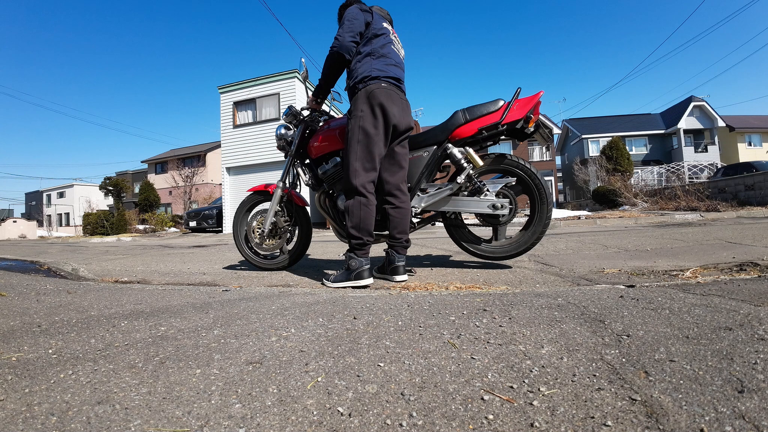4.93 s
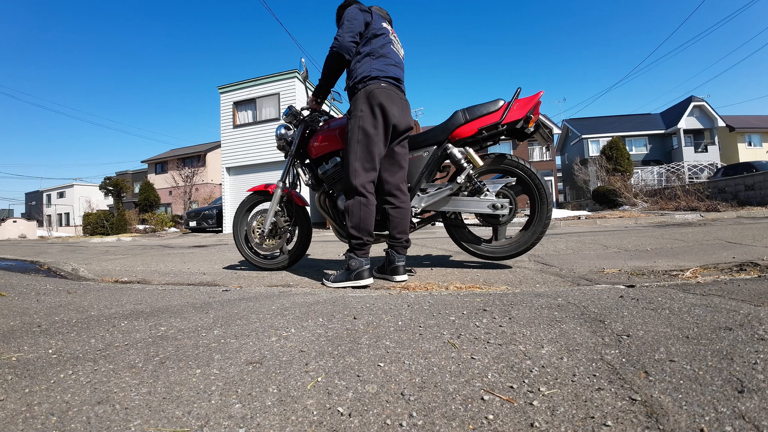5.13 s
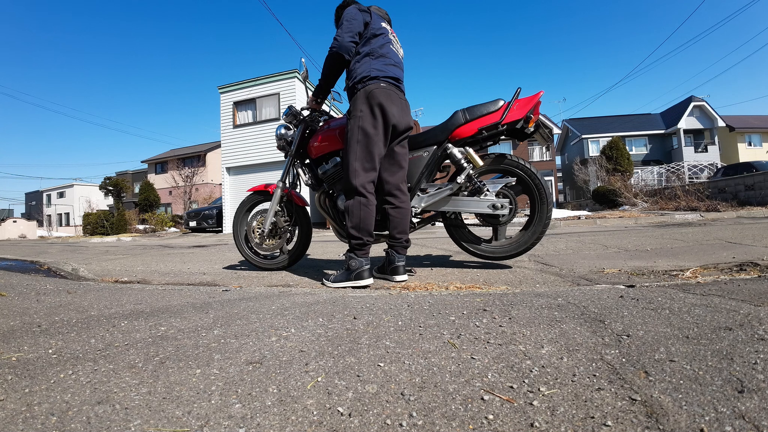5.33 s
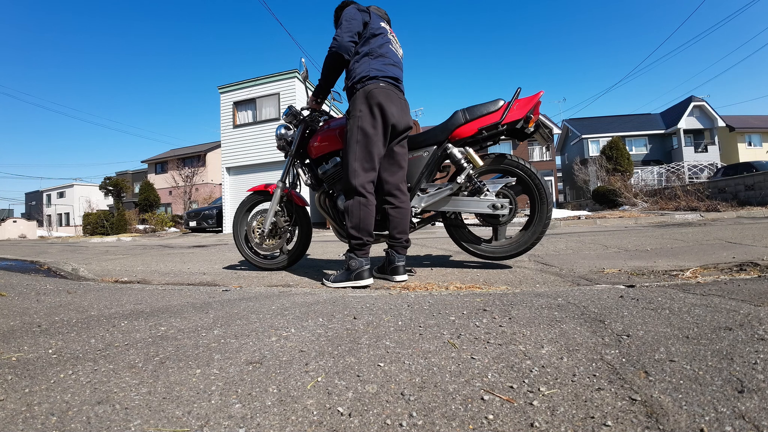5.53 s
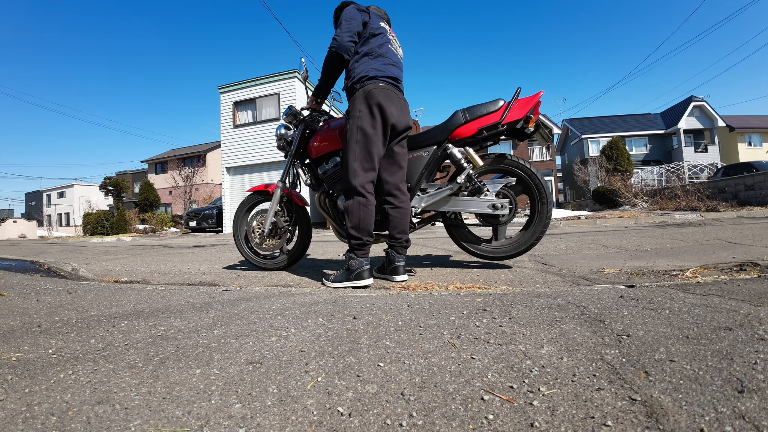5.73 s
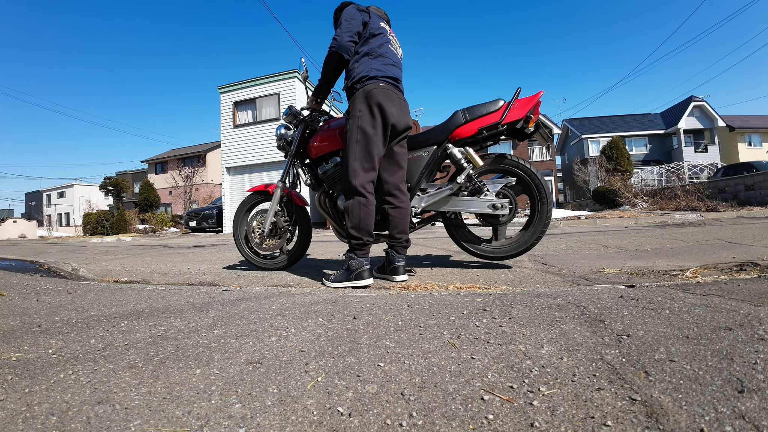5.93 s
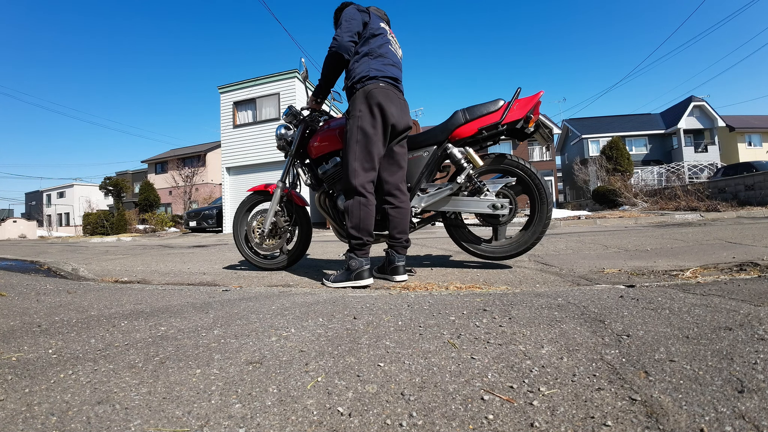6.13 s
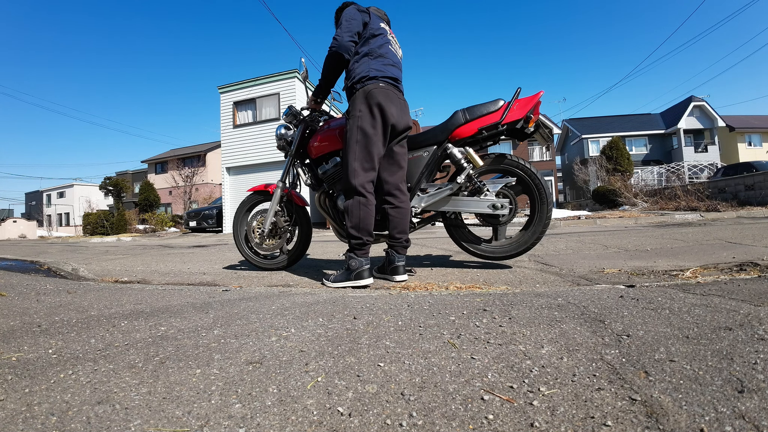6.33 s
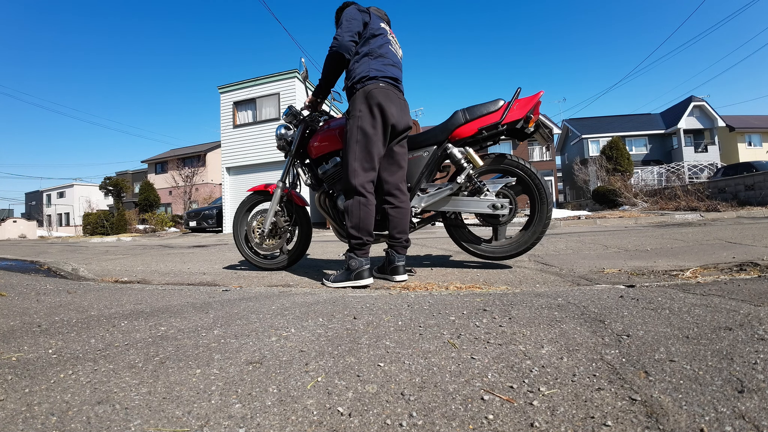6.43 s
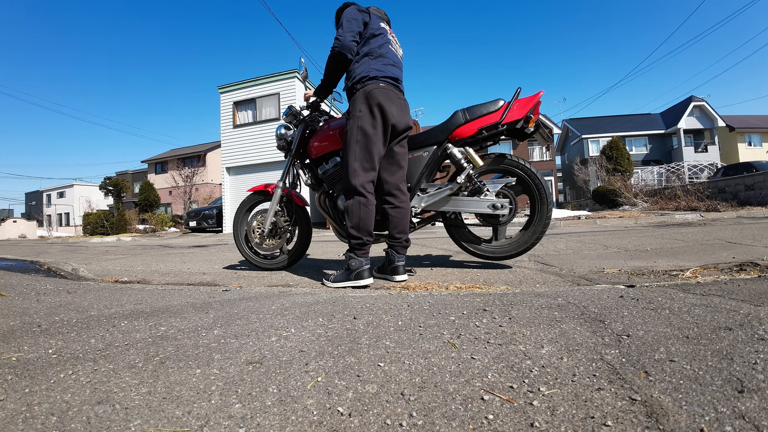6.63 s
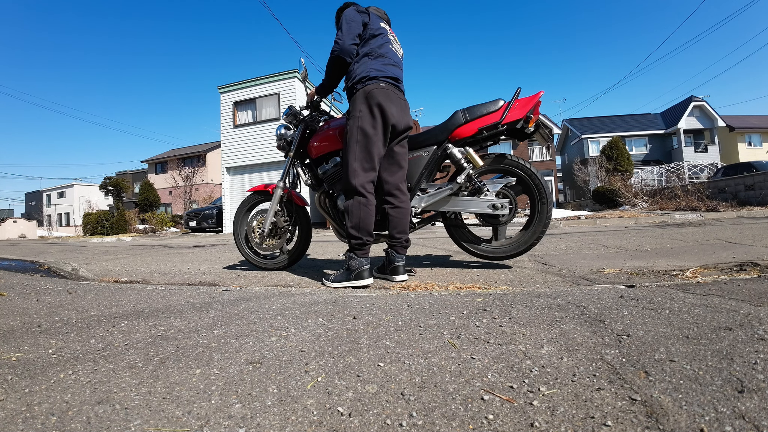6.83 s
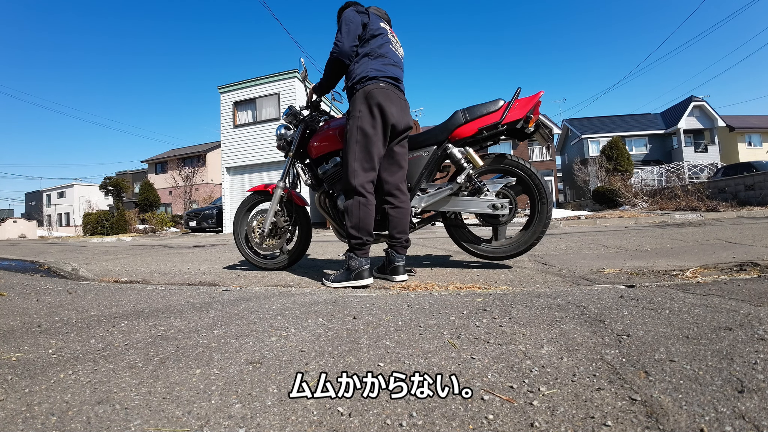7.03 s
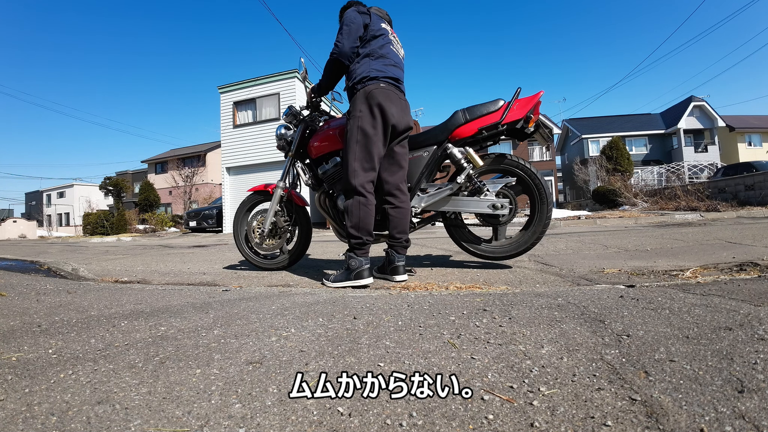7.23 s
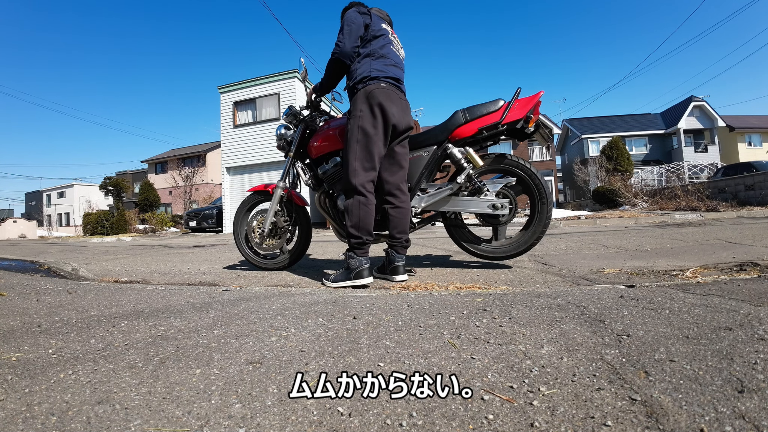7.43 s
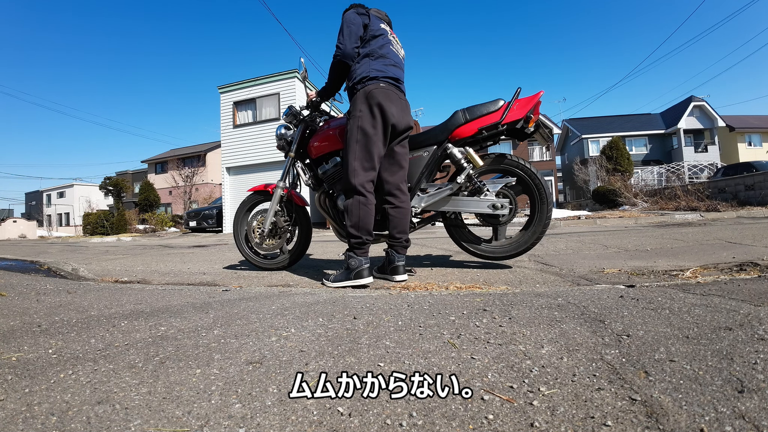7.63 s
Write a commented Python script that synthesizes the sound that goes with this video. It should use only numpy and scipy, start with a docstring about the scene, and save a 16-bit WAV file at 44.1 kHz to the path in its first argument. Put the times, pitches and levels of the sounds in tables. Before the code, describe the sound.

A motorcycle's electric starter is cranking a cold engine on a quiet street, a few metres from the microphone. Its gears whine and rasp in a quick, sagging rhythm over soft exhaust puffs, then run down. After a brief pause a button clicks and a longer try follows, but the engine never fires. As it stops, wind buffets the microphone over small clicks and faint distant traffic.

```python
"""On a quiet street an electric starter is already cranking a cold four-cylinder motorcycle engine.
Its gears whine and rasp through the engine case, sagging in pitch at each compression, while the valve
train churns and the exhaust puffs. At 1.5 s the gears run down and a gust bumps the microphone.
At 2.4 s the button clicks for a second try; the engine never fires, and near 5.9 s it runs down with
a last puff. The wind picks up over a few small clicks, a glove's brush and the murmur of far traffic."""
import sys
import numpy as np
from scipy import signal
from scipy.fft import rfft, irfft, next_fast_len
from scipy.io import wavfile

SR = 44100
rng = np.random.default_rng(int(sys.argv[2]) if len(sys.argv) > 2 else 0)


def store_pcm(level_fs):
    """Save levels as 16-bit WAV."""
    pcm = np.round(np.clip(level_fs, -1, 1) * 32767).astype(np.int16)
    wavfile.write(sys.argv[1], SR, np.atleast_2d(pcm).T)


N = 339215
TIME = np.arange(N) / SR


def gain_of(db):
    """Decibels to a factor."""
    return 10 ** (np.asarray(db) / 20)

def unit_rms(x):
    """Scales to rms 1."""
    return x / np.sqrt(np.mean(x ** 2) + 1e-20)

def curve_at(points, hz):
    """Reads a breakpoint curve on a log-frequency axis."""
    point_hz, value = np.transpose(points)
    return np.interp(np.log(hz + 1), np.log(point_hz + 1), value)

def add(mix, start_s, sound):
    """Mixes a sound in; it may begin before time zero."""
    at = round(start_s * SR)
    sound = sound[max(-at, 0):]
    part = mix[max(at, 0):][:len(sound)]
    part += sound[:len(part)]

def shaped(x, eq):
    """Applies an EQ curve and scales to rms 1."""
    size = next_fast_len(N)
    gain = gain_of(curve_at(eq, np.fft.rfftfreq(size, 1 / SR)))
    return unit_rms(irfft(rfft(x, size) * gain, size)[..., :N])

def wander(hz):
    """Random modulation of rms 1, with hz new values a second."""
    knots = rng.standard_normal(N // 16)
    return unit_rms(np.interp(TIME * hz, np.arange(len(knots)), knots))

def lagging(x, lag_s):
    """Builds up and dies away like a ringing part."""
    keep = np.exp(-1 / (lag_s * SR))
    return signal.lfilter([1 - keep], [1, -keep], x)

def swell(peak_s, length_s, level_db):
    """A bell-shaped rise and fall."""
    return gain_of(level_db) * np.exp(-2 * ((TIME - peak_s) / length_s) ** 2)

def held(hold_s, level_db, fade_db, attack_s=.006, release_db_per_s=800.5):
    """An envelope: attack, fading hold, release."""
    t = np.arange(0, hold_s + .3, 1 / SR)
    attack = np.sin(np.pi / 2 * np.minimum(t / attack_s, 1)) ** 2
    release_db = release_db_per_s * np.maximum(t - attack_s - hold_s, 0)
    return attack * gain_of(level_db - fade_db * np.minimum(t / hold_s, 1) - release_db)

def scatter(x, t60_s, lowpass_hz, order=1):
    """Diffuse reflections: a dulled noise tail, different left and right."""
    t = np.arange(SR // 2) / SR
    tail = rng.standard_normal((2, len(t))) * gain_of(-60 * t / t60_s) * (t > .002)
    tail /= np.linalg.norm(tail, axis=1, keepdims=True)
    tail = signal.lfilter(*signal.butter(order, lowpass_hz, fs=SR), tail)
    return signal.oaconvolve(x[None], tail, axes=1)[:, :N]

# Phase between the two microphone ports: freq_hz, left_lead_rad
STEREO_PHASE = [(0, -1), (4650, 0.22), (5430, 1.24), (7670, 0.6), (8010, 0.6), (9130, 0.7), (9470, -2),
                (9990, 1.5), (12500, 0.3), (15200, 0.5), (15600, -1.5), (16400, 0.3)]
# Balance between the ports: freq_hz, left_over_right_db
STEREO_BALANCE = [(60, -0.29), (99, -0.5), (160, 0.0), (270, 0.0), (450, 0.0), (740, 0.0), (1220, 0.0),
                  (2010, 0.0), (3330, 0.0), (5500, 0.0), (9080, -1.5), (15000, 0.97)]
def street_space(x, frame_db=-9, width_db=-4, houses_db=-25):
    """Frame and ground scatter the sound at once, houses linger; it meets two ports at a slant."""
    near = x + gain_of(frame_db) * scatter(x, t60_s=.062, lowpass_hz=3002)[0]
    size = next_fast_len(N)
    hz = np.fft.rfftfreq(size, 1 / SR)
    left = gain_of(curve_at(STEREO_BALANCE, hz) / 2) * np.exp(1j * curve_at(STEREO_PHASE, hz) / 2)
    pair = irfft(rfft(near, size) * np.array([left, 1 / left]), size)[:, :N]
    treble = np.diff(x, prepend=0) / 2
    width = gain_of(width_db) * scatter(treble, t60_s=.025, lowpass_hz=13000)
    houses = gain_of(houses_db) * scatter(x, t60_s=.9, lowpass_hz=4000, order=3)
    return pair + width + houses

# Dark tone of the traffic bed: freq_hz, gain_db
TRAFFIC_EQ = [(100, -3), (250, -0.5), (400, -5), (700, -3.5), (1000, -8.5), (1400, -15), (2000, -25.5),
              (3500, -25.5), (5500, -31), (10000, -38), (16000, -46.5)]
def traffic(level_db=-62, width=.45):
    """The even murmur of distant traffic."""
    air = rng.standard_normal(N) + width * rng.standard_normal((2, N))
    return gain_of(level_db + .67 * wander(hz=3.7)) * shaped(air, TRAFFIC_EQ)

# Fader ride of the steady breeze: time_s, level_db
BREEZE_RIDE = [(1.7, -47), (2.05, -43.5), (2.2, -52), (2.45, -56), (2.7, -48), (6.2, -46.5), (6.32, -38.5),
               (6.5, -41.5), (7.02, -34), (7.2, -40), (7.69, -44)]
# Low thumps of air; gusts, except at 6.145 s, a last soft low puff from the exhaust as the engine stops:
# peak_s, length_s, level_db
THUMP_CUES = [(2.128, .022, -28), (6.145, 0.029, -40), (6.265, .025, -35), (6.36, .025, -35),
              (6.421, .045, -29.5), (6.604, .05, -31), (6.721, .08, -32.5), (6.817, 0.045, -33.5),
              (6.913, .04, -30.5), (7.0, .13, -34), (7.363, .035, -33), (7.444, .04, -37.5),
              (7.531, .04, -32), (7.655, .025, -37)]
# Tone of strong buffeting: freq_hz, gain_db
BUFFET_EQ = [(12, -37), (25, -4), (59, -1.5), (146, -5), (252, -13.5), (400, -27.5), (600, -41),
             (1000, -59), (2000, -84)]
def air_buffets(trim_db=1.5, lumps_db=4, width=1.8):
    """Wind and the last exhaust puff buffet the ports; only stronger air reaches above a deep rumble."""
    shared, left, right = rng.standard_normal((3, N))
    air = shared + width * np.array([left, right])
    breeze = gain_of(np.interp(TIME, *np.transpose(BREEZE_RIDE)))
    level_db = 10 * np.log10(breeze ** 2 + sum(swell(*thump) ** 2 for thump in THUMP_CUES))
    strength = np.clip((level_db + 46) / 15, 0, 1)
    rumble = shaped(air, [(12, -29), (25, 3), (70, -2), (150, -16), (300, -38), (1000, -80)])
    buffet = strength * shaped(air, BUFFET_EQ) + (1 - strength) * rumble
    lumps = unit_rms(gain_of(lumps_db * wander(hz=35.38)))
    return buffet * lumps * gain_of(level_db + trim_db)

def glove():
    """A glove brushes the handlebar: a soft, grainy swish."""
    grain = gain_of(3 * wander(hz=203.2))
    fabric = shaped(rng.standard_normal(N), [(300, -11), (2000, -1), (7000, -3), (16000, -15.5)])
    return swell(peak_s=7.24, length_s=.05, level_db=-64) * grain * fabric

# Relay and handlebar switch hits: start_s, level_db, centre_hz, t60_s
CLICK_CUES = [(1.456, -30, 300.2, .07), (2.42, -50, 5010, .015), (2.442, -21.5, 5200, .025),
              (2.443, -35, 325.6, 0.059), (5.838, -28.5, 300, 0.065), (6.388, -60, 5000, 0.014),
              (6.505, -58, 2000, 0.031), (6.698, -57, 5000, .015), (6.799, -58, 7000, 0.013),
              (7.105, -46, 5000, 0.015), (7.263, -33, 2400, 0.022)]
def switch_clicks(q=.86, trim_db=-4):
    """Contacts snap, each a fast-dying burst of band-passed noise."""
    out, t = np.zeros(N), np.arange(SR // 8) / SR
    for start_s, level_db, centre_hz, t60_s in CLICK_CUES:
        band = signal.iirpeak(centre_hz, q, SR)
        burst = signal.lfilter(*band, signal.lfilter(*band, rng.standard_normal(len(t))))
        add(out, start_s, unit_rms(burst) * gain_of(level_db + trim_db - 60 * t / t60_s))
    return out

# Tiny high squeaks: start_s, length_s, pitch_hz, level_db
SQUEAK_CUES = [(3.603, .02, 14800, -47.5), (4.411, .017, 11000, -31.5)]
def bearing_squeaks():
    """A dry bearing sings for an instant on one pure tone."""
    out = np.zeros(N)
    for start_s, length_s, pitch_hz, level_db in SQUEAK_CUES:
        tone = np.sin(2 * np.pi * pitch_hz * np.arange(0, length_s, 1 / SR))
        add(out, start_s, gain_of(level_db) * tone * signal.windows.tukey(len(tone)))
    return out

# Starter button presses (coasting sheds two thirds of the speed in coast_s): on_s, off_s, coast_s
PRESSES = [(-.5, 1.503, .16), (2.44, 5.876, .205)]
def motor(spin_up_s=.035, engage_db=-13, engage_s=.11, coast_db=-2.5):
    """Each press spins the motor up, firms the drive and lets it coast; speed runs from 0 to 1."""
    speed, drive, coasting = np.zeros((3, N))
    for on_s, off_s, coast_s in PRESSES:
        now = TIME >= on_s
        since_on, since_off = TIME[now] - on_s, np.maximum(TIME[now] - off_s, 0)
        speed[now] = (1 - np.exp(-since_on / spin_up_s)) * np.exp(-since_off / coast_s)
        firming_db = engage_db * np.maximum(1 - (since_on / engage_s) ** 6, 0)
        drive[now] = gain_of(np.where(since_off > 0, coast_db, firming_db))
        coasting[now] = since_off > 0
    return speed, drive, coasting

# Cranking rhythm, two crank turns a cycle; early_s rushes mainly the third compression: start_s, early_s
CYCLES = [(-.121, .011), (.229, .011), (.577, 0.0097), (0.926, 0.0037), (1.282, 0.005), (2.585, -.003),
          (2.94, 0.00069), (3.293, 0), (3.642, -0.0029), (3.992, 0.0015), (4.342, .001), (4.691, 0.0025),
          (5.041, 0.0033), (5.391, -0.00078), (5.739, 0)]
# One puff per cylinder in each cycle: offset_s, gain_db
PUFF_PATTERN = [(.023, -2.5), (0.107, -2), (.198, 1.5), (.292, 0)]
# Boom of the exhaust pipe: pitch_hz, gain_db, t60_s
PIPE_MODES = [(30, -4, 0.11), (75, -3, 0.24), (99, -16, .08), (157, -18.5, 0.38)]
def exhaust(boom_db=-31, push_db=-33, push_s=.0046):
    """While the engine turns, each cylinder lets out a soft puff that sets the pipe booming."""
    t = np.arange(SR // 3) / SR - .02
    boom = sum(gain_of(db - 60 * abs(t) / t60_s) * np.cos(2 * np.pi * hz * t)
               for hz, db, t60_s in PIPE_MODES)
    onset = (1 + np.tanh(t / .0038)) / 2
    puff = gain_of(boom_db) * boom * onset + gain_of(push_db) * np.exp(-(t / push_s) ** 2)
    out = np.zeros(N)
    for start_s, _ in CYCLES:
        for offset_s, gain_db in PUFF_PATTERN:
            at_s = start_s + offset_s + t[0]
            if at_s > 0 and any(on < at_s < off + coast_s / 2 for on, off, coast_s in PRESSES):
                add(out, at_s, gain_of(gain_db + rng.normal(0, 1)) * puff)
    return out

# Metallic colour of the case: centre_hz, width_hz, gain_db
CASE_RESONANCES = [(603, 78, 7.5), (710, 91, -7), (789, 54, 8.5), (914, 40, 4), (1218, 101, 9.5),
                   (1414, 93, 6.5), (1546, 120, -2.5), (1790, 80, 4.5), (2498, 41, 8), (2720, 80, 4.5),
                   (3014, 63, 6), (3510, 150, 6), (3700, 38, 3), (4610, 140, 7.5), (6940, 94, 6),
                   (6460, 28, 5), (7630, 56, 5), (7320, 80, 2), (8134, 250, 10), (8630, 82, 4),
                   (9340, 340, -9), (9690, 120, 8.5), (9920, 99, 7.5), (10200, 90, 5), (11230, 180, 3.5),
                   (15700, 180, 6)]
def engine_case(x, size=8192):
    """The cast case rings at its resonances after each excitation."""
    hz = abs(np.fft.fftfreq(size, 1 / SR))
    eq_db = sum(db / (1 + (2 * (hz - centre) / width) ** 2) for centre, width, db in CASE_RESONANCES)
    minimum_phase = np.exp(np.conj(signal.hilbert(np.log(gain_of(eq_db)))))
    ring = np.fft.ifft(minimum_phase).real
    return signal.oaconvolve(x, ring[:size // 2])[:N]

# Long spins of the crank and short lurches as it stops: start_s, hold_s, level_db, fade_db
CRANK_CUES = [(-.5, 2.114, -37.5, 0.5), (1.55, .055, -40.5, 0), (1.691, .1, -51, 0.5),
              (2.443, 3.54, -37, 0), (5.935, .025, -40, 0), (6.01, .105, -35, 11)]
def crank_envelope():
    """Loudness of the turning engine."""
    level = np.zeros(N)
    for start_s, *shape in CRANK_CUES:
        add(level, start_s, held(*shape, release_db_per_s=370))
    return level

# Tone of the chain and valve train: freq_hz, gain_db
CHURN_EQ = [(60, -18.5), (200, -11), (240, 3.5), (290, -7.5), (350, -1.5), (420, -10.5), (500, 2.5),
            (1000, -1), (2000, -5), (3400, -4), (5000, -15.5), (8000, -21.5), (16000, -40)]
def valve_train(ticks_per_s=1600, trim_db=-3):
    """Cam chain links and tappets tick over the churn of oil."""
    ticks = (rng.random(N) < ticks_per_s / SR) * rng.uniform(-1.96, 2.25, N)
    oil = rng.standard_normal(N)
    return gain_of(trim_db) * crank_envelope() * shaped(2.5 * ticks + .5 * oil, CHURN_EQ)

# The four compressions of a cycle (bend under 1 sags early, over 1 late):
# offset_s, attack_s, hold_s, load_db, fade_db, rebound_dip_db, pitch_hz, sag_hz, bend, early_share
STROKES = [(-.001, .006, .032, .8, 1, 0, 1493, 155, .6, 0), (.082, .007, .032, 1, 2.2, 5, 1511, 95, .6, .1),
           (.137, .01, .062, -1.9, -1.3, 1.5, 1490, 118, .8, 0.97),
           (.222, .011, .067, -1.2, -1, 2.5, 1447, 185, 1.7, .35)]
def compressions(free_run_s, recover_s):
    """Lays out the compressions that fall within a press, once the motor has had its free run."""
    cues = [(start_s + offset_s - early_s * share, *shape)
            for start_s, early_s in CYCLES for offset_s, *shape, share in STROKES]
    return [cue for cue in cues
            if any(on + free_run_s < cue[0] < off - recover_s for on, off, _ in PRESSES)]

# Shoves on the gears while spinning up and running down: start_s, hold_s, load_db, fade_db
SHOVE_CUES = [(1.517, 0.089, 0, 7), (2.475, .014, -6, -0.5), (2.502, .014, -2.5, 0.5),
              (2.531, 0.084, -.5, 1), (5.887, 0.091, 0, 8), (6.009, .085, -7.5, 14)]
def gear_strain(free_hz=1235, free_run_s=.2, recover_s=.012, rebound_at_s=.028, rebound_s=.005):
    """Full-speed tooth rate and tooth load: each compression loads the teeth and drags the pitch."""
    load = gain_of(13) * crank_envelope()  # between compressions the load follows the crank
    pitch_points = [(s, free_hz) for on, off, _ in PRESSES
                    for s in (on, on + free_run_s, off + recover_s)]
    progress = np.linspace(0, 1, 10)
    for cue in compressions(free_run_s, recover_s):
        start_s, attack_s, hold_s, load_db, fade_db, dip_db, pitch_hz, sag_hz, bend = cue
        louder, faster = rng.standard_normal(2)  # no two compressions are alike
        stroke = held(hold_s, load_db + .25 * louder, fade_db, attack_s)
        t = np.arange(len(stroke)) / SR
        rebound = np.exp(-((t - rebound_at_s) / rebound_s) ** 2)  # the teeth bounce apart once
        add(load, start_s, stroke * gain_of(-dip_db * rebound))
        sagging_hz = pitch_hz * (1 + .009 * faster) - sag_hz * progress ** bend
        times = start_s + attack_s + hold_s * progress
        pitch_points += [*zip(times, sagging_hz), (times[-1] + recover_s, sagging_hz[-1])]
    for start_s, *shape in SHOVE_CUES:
        add(load, start_s, held(*shape))
    tooth_hz = np.interp(TIME, *np.transpose(sorted(pitch_points)))
    return tooth_hz * (1 + .004 * wander(hz=59.8)), load

# Bright scrape of the teeth: freq_hz, gain_db
RASP_EQ = [(100, -31), (400, -13.5), (600, -5.5), (1000, -8.5), (1300, 0.5), (1900, -2.5), (2800, 1.5),
           (4200, -3.5), (5300, -5.5), (7200, 4.5), (8600, -3.5), (9400, -5), (11500, -7), (14000, -15.5),
           (16000, -13)]
def gear_rasp(teeth, speed, grain_db=1.5, slow_lowpass_hz=10000):
    """Sliding teeth make noise that pulses once a tooth and loses its top as they slow."""
    pulses = .83 + np.exp(-(teeth % 1) / .3)
    grain = gain_of(grain_db * wander(hz=447.7))
    bright = shaped(pulses * grain * rng.standard_normal(N), RASP_EQ)
    dull = signal.filtfilt(*signal.butter(3, slow_lowpass_hz, fs=SR), bright)
    return dull + speed ** 2 * (bright - dull)

# Partials of the tooth rate: harmonic, gain_db
WHINE_PARTIALS = [(1, -4.5), (2, -7.5), (3, -14.5), (4, -18.5), (5, -6.5), (6, -4), (7, -8.5), (8, -16),
                  (9, -22.5), (10, -26.5), (11, -25.5)]
def gear_whine(teeth, shaft, contact, coasting, throb=.21, rough=.44, hardness=.24, ring_s=.002):
    """Meshing teeth whine, duller when coasting; the pinion's runout throbs once a shaft turn."""
    whine = np.zeros(N)
    for harmonic, gain_db in WHINE_PARTIALS:
        runout = np.cos(2 * np.pi * (shaft + rng.random()))
        bite = rough * (wander(hz=300.5) + 1j * wander(hz=300.4))  # no two teeth bite alike
        # high partials need hard contact; low ones ring on in the case
        force = contact ** (1 + hardness * (harmonic - 1)) * gain_of(-.7 * (harmonic - 1) * coasting)
        envelope = lagging(force, ring_s / harmonic ** 1.9)
        tone = np.exp(2j * np.pi * (harmonic * teeth + rng.random()))
        whine += gain_of(gain_db) * envelope * ((1 + throb * runout + bite) * tone).real
    return whine

def starter(whine_db=-27.7, rasp_db=-29.2, hum_db=-45.5, jitter_teeth=.008, coast_play_teeth=.075):
    """The motor hums and drives gears that whine and rasp under load and rattle as they coast."""
    tooth_hz, load = gear_strain()
    speed, drive, coasting = motor()
    load *= gain_of(.93 * wander(hz=70.07))
    rattle = (jitter_teeth + coast_play_teeth * coasting) * wander(hz=707.5)
    teeth = np.cumsum(tooth_hz * speed) / SR + rattle
    shaft = teeth / 9  # turns of a nine-tooth pinion
    whine = gain_of(whine_db) * gear_whine(teeth, shaft, drive * load, coasting)
    rasp = gain_of(rasp_db) * load * gear_rasp(teeth, speed)
    hum = gain_of(hum_db) * (drive * speed ** 2) ** 2 * np.sin(2 * np.pi * shaft)
    return whine + rasp + hum

def scene():
    """The motorcycle a few metres off, in the open street."""
    engine = engine_case(starter() + valve_train())
    bike = engine + exhaust() + switch_clicks() + bearing_squeaks() + glove()
    return street_space(bike) + air_buffets() + traffic()

def record(dry, low_cut_hz=18, high_cut_hz=16000):
    """The microphone sheds the deepest rumble and the very top."""
    thinned = signal.sosfilt(signal.butter(2, low_cut_hz, "high", fs=SR, output="sos"), dry)
    high_cut = signal.firwin(511, high_cut_hz, window=("kaiser", 9), fs=SR)
    return signal.oaconvolve(thinned, high_cut[None], "same")


dry = scene()
out = record(dry)
store_pcm(out)
```